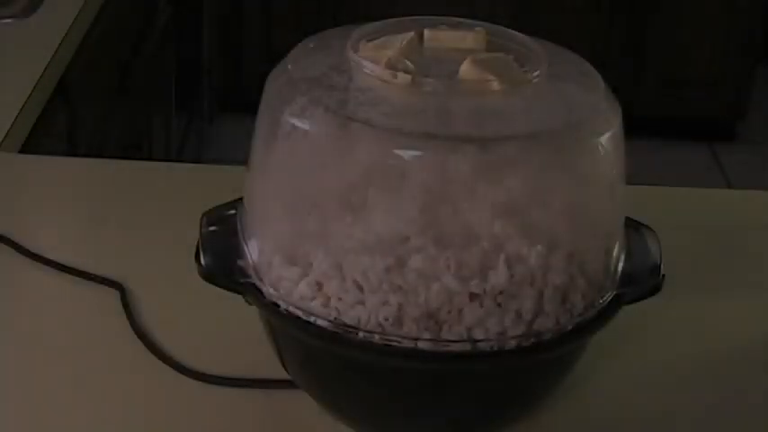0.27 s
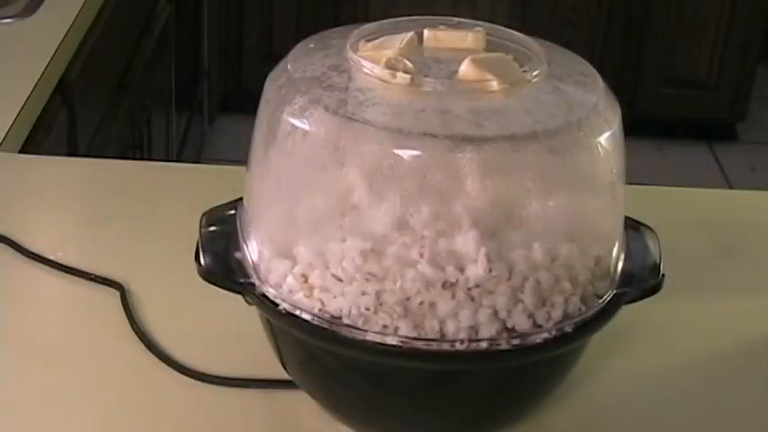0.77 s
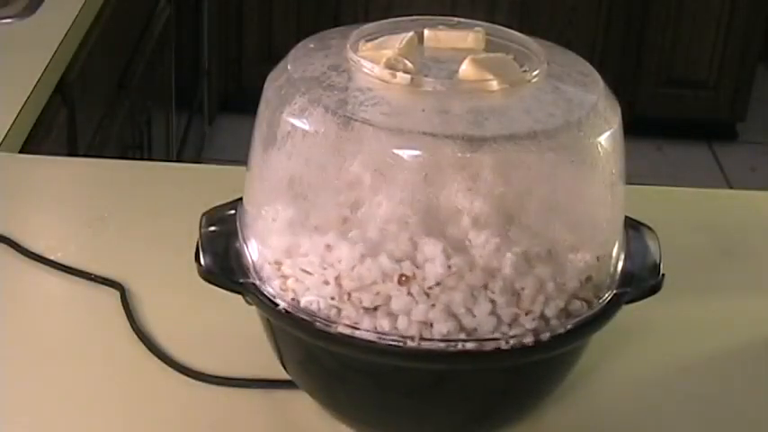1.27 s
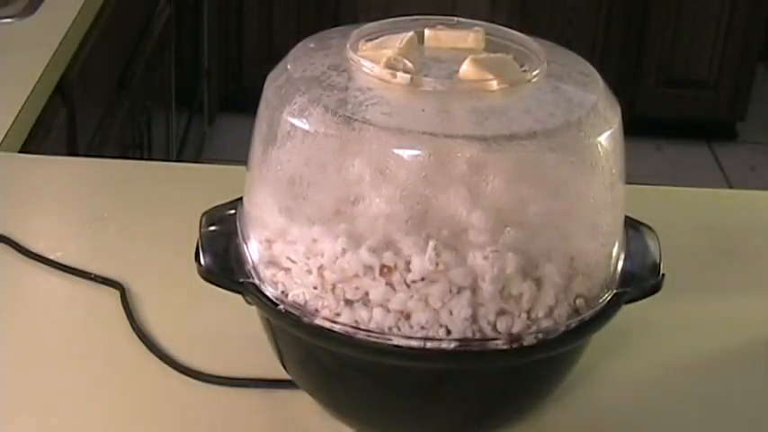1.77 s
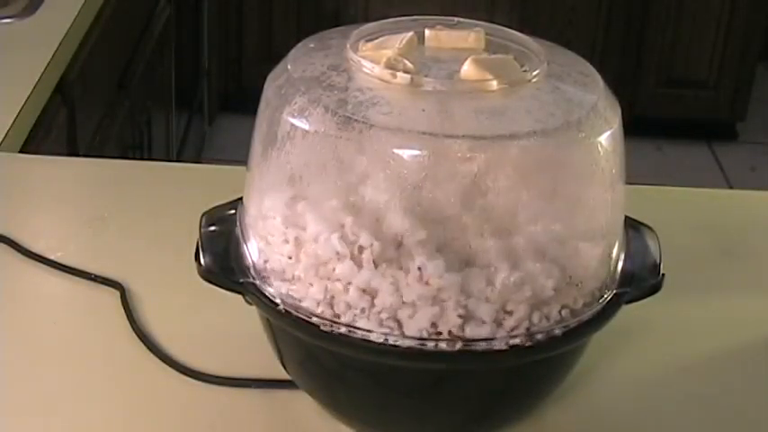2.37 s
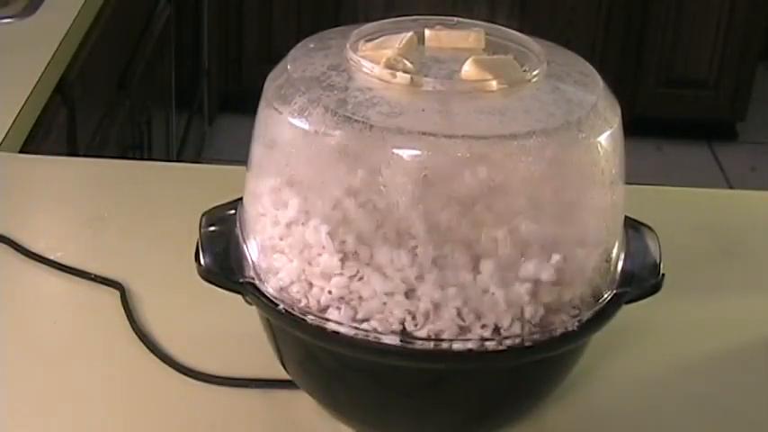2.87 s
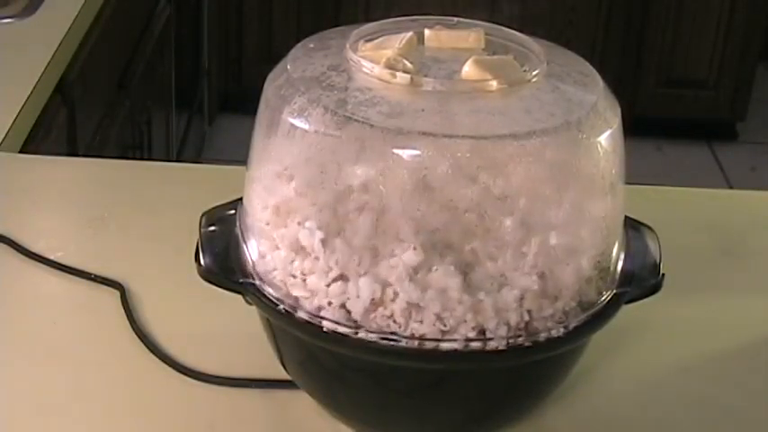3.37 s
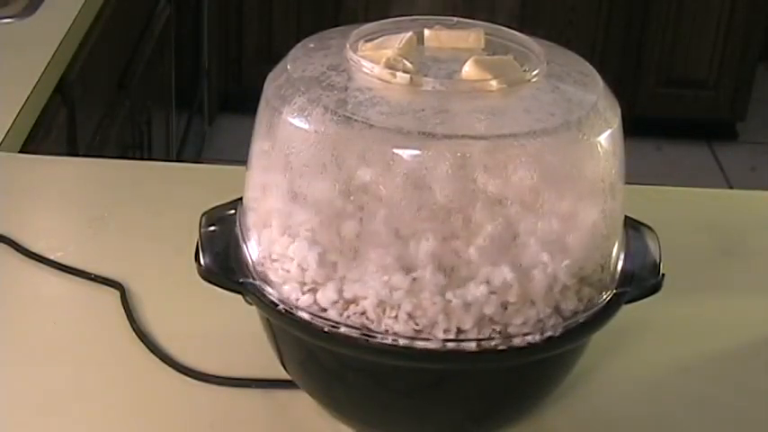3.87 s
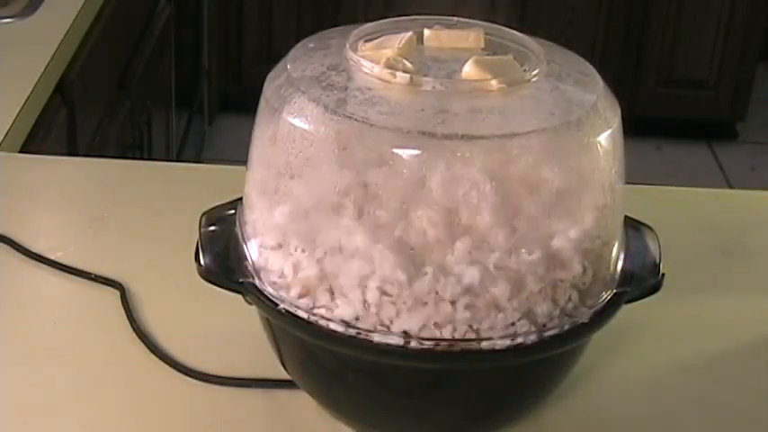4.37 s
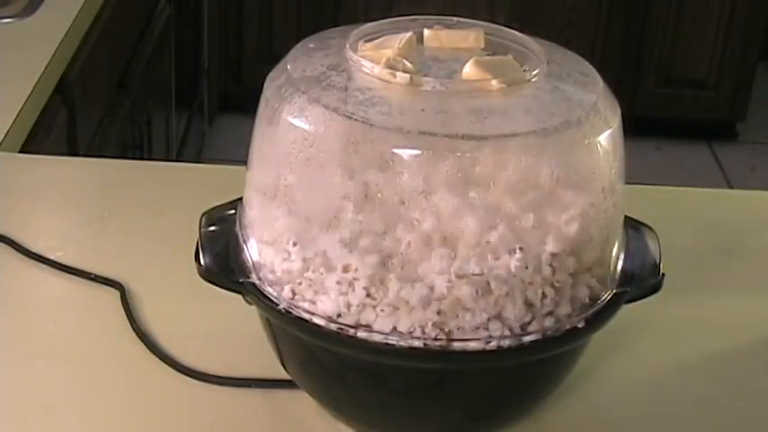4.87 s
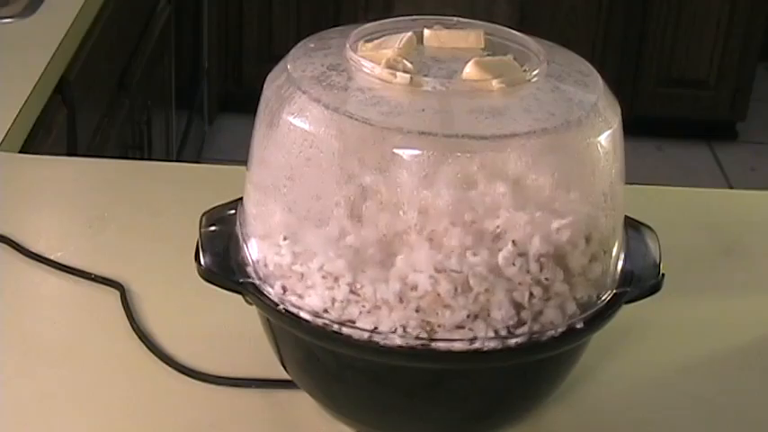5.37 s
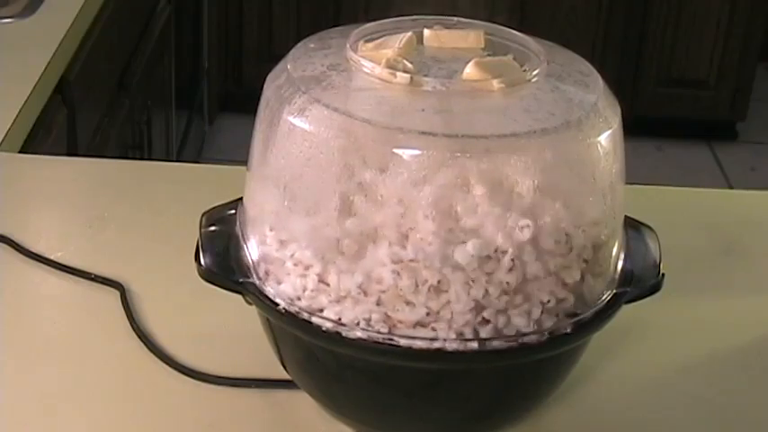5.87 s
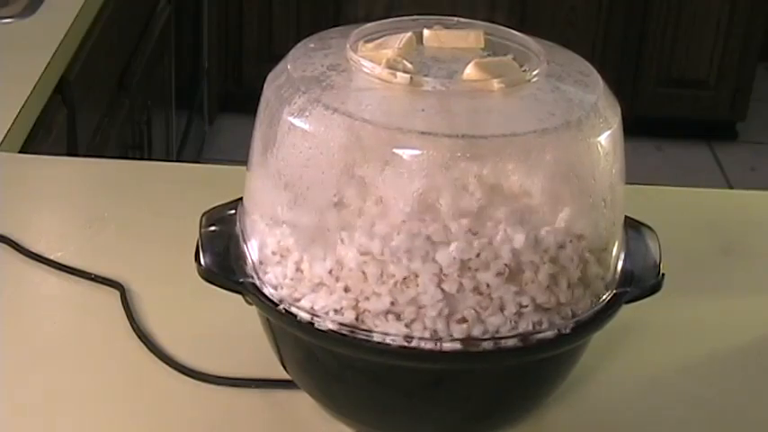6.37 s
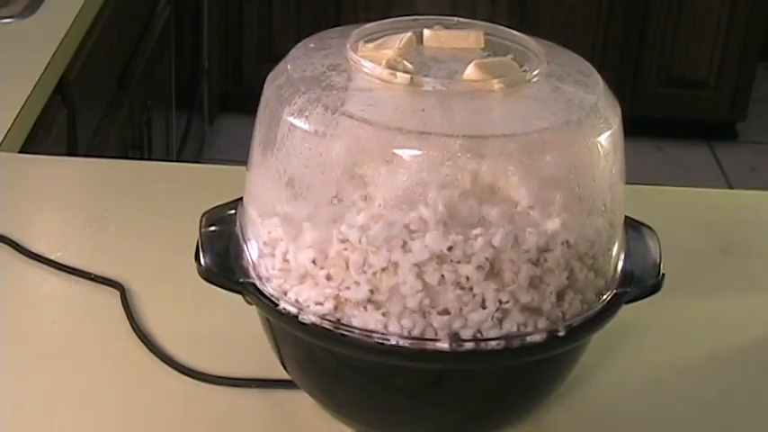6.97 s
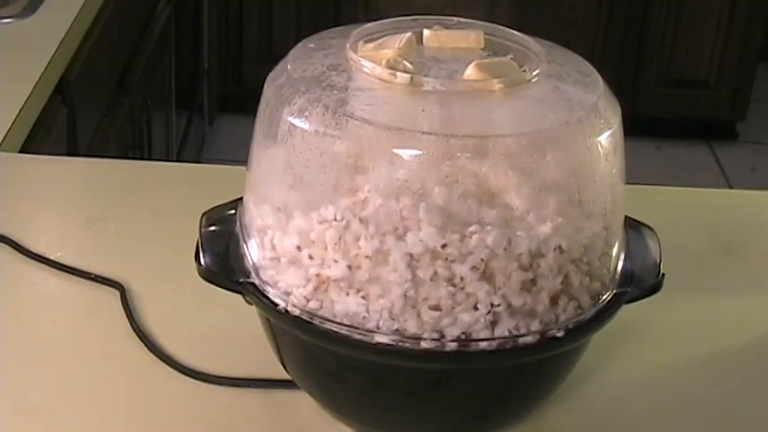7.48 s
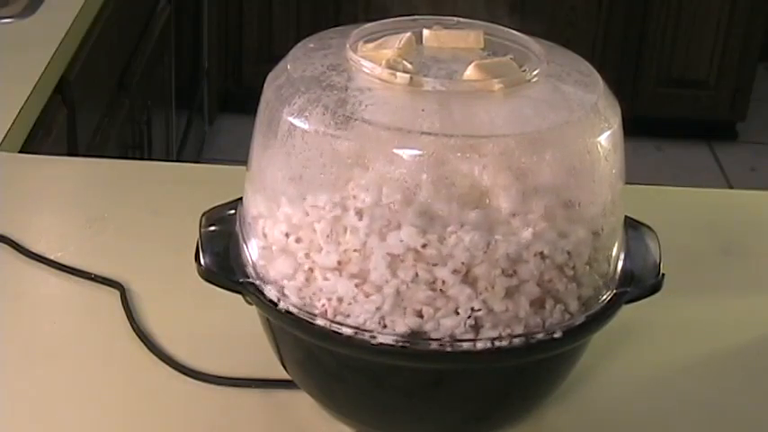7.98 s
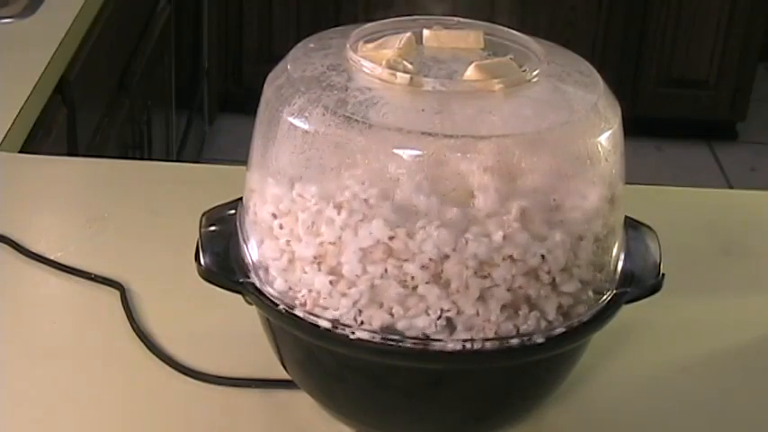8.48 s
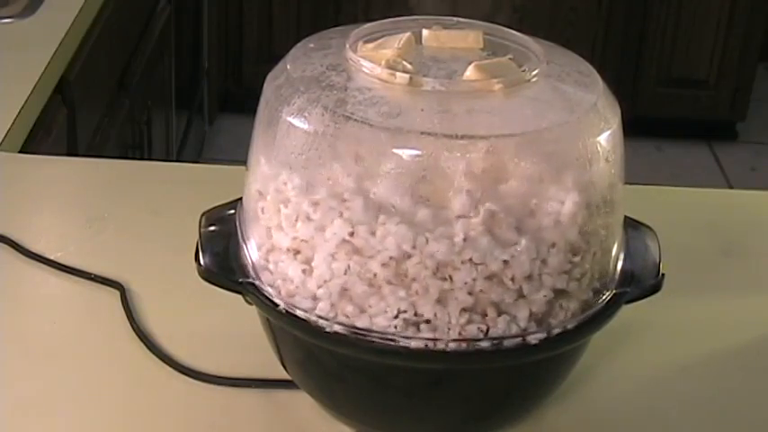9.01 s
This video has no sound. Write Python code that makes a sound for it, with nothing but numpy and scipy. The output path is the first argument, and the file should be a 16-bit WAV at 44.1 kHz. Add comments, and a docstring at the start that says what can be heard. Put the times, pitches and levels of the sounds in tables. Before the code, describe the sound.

Corn kernels pop fast and unevenly inside a covered popper, heard close in stereo with a short kitchen reverberation. Quiet ticks open, then loud cracks and dull thuds come roughly twenty or more a second, sometimes clustered, sometimes with tiny gaps. Light flakes rattle softly between them, and occasional harder hits slap the plastic dome. The motor is only a faint steady noise, and the loudest peaks sound slightly clipped.

```python
"""In a kitchen, an electric popcorn popper on the counter, close to a microphone. A motor and the room make
a faint steady rush of noise. Bursting kernels thump the bowl and its air (fading sine tones), crack (short
noise bursts) and knock the plastic dome (noise through resonances). Flakes land softly just after, a few
throws of corn slam the dome wall, and the kitchen answers with reflections."""
import sys
import numpy as np
from scipy import signal
from scipy.fft import rfft, irfft, next_fast_len
from scipy.io import wavfile

SR = 44100
rng = np.random.default_rng(int(sys.argv[2]) if len(sys.argv) > 2 else 0)


def master_out(mix):
    """Clip the mix to full scale and print it as 16-bit PCM to the path in sys.argv[1]."""
    frames = np.transpose(np.atleast_2d(mix))
    ceiling = np.clip(frames, -1, 1)
    pcm = np.round(ceiling * 32767).astype(np.int16)
    wavfile.write(sys.argv[1], SR, pcm)


N = 407699


def amp(db):
    """Turn decibels into a gain."""
    return 10 ** (np.asarray(db) / 20)


def along(points, hz):
    """Read a value between (f/Hz, value) points, on a log frequency axis."""
    f, value = np.transpose(points)
    return np.interp(np.log(hz + 1), np.log(f + 1), value)


def filtered(x, response):
    """Multiply the spectrum of x by a response that depends on frequency."""
    m = next_fast_len(N + SR)
    return irfft(rfft(x, m) * response(np.fft.rfftfreq(m, 1 / SR)), m)[..., :N]


def resonance(f, hz, width_hz):
    """One resonance that rings only after it is struck, gain 1 at its peak."""
    return 1j * f * width_hz / (hz * hz - f * f + 1j * f * width_hz)


def place(seconds, sounds):
    """Add one row of sound at each time."""
    starts = np.round(seconds * SR).astype(int)[:, None]
    at = starts + np.arange(sounds.shape[1])
    return np.bincount(at.ravel(), sounds.ravel(), N + SR)[:N]


def puffs(seconds, db, t60, rise_s, grain_db):
    """A grainy, dying noise burst of uneven length at each time; one track for each column of levels."""
    t = np.arange(SR // 20) / SR
    uneven_t60 = t60 * rng.lognormal(0, 0.25, (len(seconds), 1))
    shape = amp(-60 * t / uneven_t60) * (1 - np.exp(-t / rise_s))
    # the loudness jumps at random every 32 samples
    grains = amp(grain_db * rng.standard_normal((len(seconds), len(t) // 32 + 1)))
    grains = grains.repeat(32, axis=1)[:, :len(t)]
    noise = shape * grains * rng.standard_normal((len(seconds), len(t)))
    return np.array([place(seconds, amp(level)[:, None] * noise) for level in db.T])


# how alike left and right are in spread-out sound: f/Hz, likeness [0-1]
LIKENESS = [(30, 0.85), (150, 1), (550, 0.81), (1200, 1), (9000, 0.66)]


def pair(x):
    """Mix two unrelated signals into left and right; the shared part sets how alike they are."""
    turn = lambda hz: np.arccos(np.clip(along(LIKENESS, hz), 0, 1)) / 2
    mid, side = filtered(x, lambda hz: np.array([np.cos(turn(hz)), np.sin(turn(hz))]))
    return np.array([mid + side, mid - side])


# tone colour of the motor and room noise: f/Hz, relative level/dB (per Hz)
MOTOR_COLOUR = [(30, -4.5), (110, -24.5), (230, -26), (8000, -42), (14000, -73)]


def motor():
    """Motor and room make a faint steady rush: coloured noise under the pops."""
    rush = filtered(rng.standard_normal((2, N)), lambda hz: amp(along(MOTOR_COLOUR, hz)))
    return amp(-31) * pair(rush / np.std(rush))


SPOT_DB = 2.2  # each knock rings each dome mode by its own amount (typical spread)
HEAPS = 8  # ways the corn can lie in the bowl
DETUNE = .025  # typical share by which the heap shifts the bowl's pitch
# ringing of the bowl and its air, close tones that beat: f/Hz, relative level/dB, time to fall 60 dB [s]
BOWL_MODES = [(166.7, -22, 0.36), (205.3, -18, 0.15), (278, -3.5, 0.078), (309.7, 1.5, 0.092),
              (346.1, -2, 0.081), (430.6, -6.5, 0.047), (489, -15, 0.094), (590, -14, 0.04)]


def thumps(seconds, thump_db):
    """Each burst pushes the bowl, which rings in dying tones tuned by how the heap lies."""
    t = np.arange(SR // 5) / SR
    hz, db, t60 = np.transpose(BOWL_MODES)[:, :, None]
    hz = hz * (1 + DETUNE * rng.standard_normal((HEAPS, 1, 1)))
    modes = amp(db - 60 * t / t60) * np.sin(2 * np.pi * hz * t) * (1 - np.exp(-t / 0.0017))
    # each push rings each tone by its own amount, 2.07 dB typical spread
    push = amp(thump_db[:, None] + 2.07 * rng.standard_normal((len(seconds), len(BOWL_MODES))))
    heap = rng.integers(HEAPS, size=len(seconds))
    return -sum(place(seconds[heap == k], push[heap == k] @ modes[k]) for k in range(HEAPS))


HULL_HZ, HULL_SPREAD_DB = 5200, 2.2  # border between dull and bright, and how far hulls vary


def dull_part(f):
    """Gain that keeps what lies below the dull-bright border."""
    return 1 / (1 + (f / HULL_HZ) ** 6)


SNAP_T60 = 0.0077  # s, typical time for a snap to fall 60 dB
ACROSS = .5  # how strongly cracks spread left and right across the heap
# crack of a hull, with the presence peak of the microphone: f/Hz, relative level/dB
CRACK_COLOUR = [(500, -3.5), (3000, 3), (5500, 4.5), (7750, 12), (10100, 2), (11300, -7.5), (14500, -35)]


def snaps(seconds, crack_db, knocks):
    """A hull snaps in a very short noise burst, duller or brighter, left or right; mid and side."""
    dull_db = HULL_SPREAD_DB * rng.standard_normal(len(seconds))
    left = rng.random(len(seconds)) < .5
    side_db = crack_db[:, None] + np.where(np.c_[left, ~left], 0, -99)  # -99 dB: silent
    levels = np.c_[crack_db + dull_db, crack_db - dull_db / 2, side_db]
    dull, bright, on_left, on_right = puffs(seconds, levels, SNAP_T60, rise_s=.0001, grain_db=1.5)
    bright = bright + amp(-23.0) * knocks.mean(0)  # the knocks add a little treble
    snap = filtered(dull, dull_part) + filtered(bright, lambda f: 1 - dull_part(f))
    both = np.array([snap, ACROSS * (on_left - on_right)])
    return filtered(both, lambda f: amp(along(CRACK_COLOUR, f)))


RATTLE_HZ, RATTLE_WIDTH_HZ, RATTLE_DB = 2400, 4500, -13  # broad rattle of corn on plastic
# ringing of the plastic dome: f/Hz, width [Hz], relative level/dB
DOME_MODES = [(510, 80, -5), (872, 130, -5.5), (1090, 68, 0), (1247.5, 70, 1.5), (1681, 99, -1),
              (2226, 90, -3), (2666, 197, -6)]


def dome_knocks(knocks):
    """Corn knocks the plastic: noise bursts ring the dome's resonances, with a broad rattle."""
    hz, width_hz, db = np.transpose(DOME_MODES)[:, :, None]
    dome = filtered(knocks, lambda f: amp(db) * resonance(f, hz, width_hz))
    rattle_shape = lambda f: resonance(f, RATTLE_HZ, RATTLE_WIDTH_HZ) * dull_part(f)
    rattle = amp(RATTLE_DB) * filtered(knocks.mean(0), rattle_shape)
    # neighbouring modes move in opposite directions
    return dome[::2].sum(0) - dome[1::2].sum(0) + rattle


THROW_S = .003  # s, longest flight of the burst corn to the dome


def bursts(seconds, thump_db, knock_db, crack_db):
    """Each burst thumps the bowl, snaps, and a moment later knocks the dome; mid and side."""
    struck = seconds + THROW_S * rng.random(len(seconds)) ** 3
    spot_db = SPOT_DB * rng.standard_normal((len(seconds), len(DOME_MODES)))
    knocks = puffs(struck, knock_db[:, None] + spot_db, 0.043, rise_s=.0004, grain_db=3)
    mid, side = snaps(seconds, crack_db, knocks)
    return np.array([dome_knocks(knocks) + mid + thumps(seconds, thump_db), side])


ORDINARY_DB = (-12, -11)  # thump and crack of an ordinary pop
KNOCK_OVER_THUMP_DB, KNOCK_OVER_CRACK_DB = 8.5, 0.5  # both thump and crack knock the dome
FLAKES, FLIGHT_S = 9, .09  # flakes thrown by each pop; spread of their flight times [s]
FLAKE_DB, FLAKE_SPREAD_DB = -18, 12  # largest flake against its pop, range of sizes
# kernels bursting: t/s, thump level/dB, crack level/dB; a time alone is an ordinary pop
KERNELS = [(0.001, -24, -26), (0.042, -22.5, -18), (0.123, -25.5, -15.5), (0.148, -22.5, -13),
           (0.164, -21, -21), (0.244, -13, -22), (0.327, -10.5, -21), (0.417, -13.5, -36), (0.447, -7, -18),
           (0.496), (0.511), (0.522), (0.573, -15, -6), (0.618), (0.709), (0.738, -7.5, -18),
           (0.763, -28, -3), (0.795, -4.5, -4), (0.823), (0.833, -22, -5.5), (0.95), (0.988),
           (1.018, -13.5, -3.5), (1.075, -26, -7.5), (1.088), (1.103), (1.127), (1.144), (1.288, -8, -13),
           (1.343, -9.5, -19), (1.421, -8.5, -9), (1.433, -7.5, -4.5), (1.461), (1.529, -28, -6), (1.549),
           (1.565), (1.587), (1.603), (1.644), (1.692, -8, -10), (1.715), (1.776, -8, -15), (1.82), (1.918),
           (1.936), (1.981, -7.5, -23), (2.019), (2.043, -7, -12), (2.112, -11, -3), (2.166, -8, -9),
           (2.18), (2.217, -4.0, -11), (2.285), (2.3, -10.5, -27), (2.39), (2.401), (2.409, -9, -25),
           (2.422, -8.5, -3), (2.501), (2.533), (2.55, -31, -6), (2.592, -12.5, -4.5), (2.643), (2.66),
           (2.724, -16, -5.0), (2.75), (2.828, -9, -19), (2.847), (2.9, -9.5, -18), (2.911),
           (2.951, -10, -21), (2.997), (3.005, -15, -5.5), (3.042, -28, -5.5), (3.1, -14.5, -6),
           (3.157, -32, -7), (3.236, -4.5, -11.0), (3.305), (3.385, -21, -2.5), (3.403), (3.43, -14, -4),
           (3.525, -8, -13), (3.557), (3.603), (3.674, -7.5, -10), (3.828), (3.841, -7, -5.5),
           (3.887, -15, -3), (3.924), (3.967, -11.5, -7), (3.998, -5.5, -15), (4.021, -9, -20),
           (4.076, -29, -1), (4.098), (4.125), (4.174), (4.187), (4.224), (4.245, -20, -12), (4.253),
           (4.27, -11.5, -22), (4.29), (4.343), (4.381), (4.472), (4.486, -20.5, -4), (4.505), (4.533),
           (4.572), (4.594, -9.5, -2.5), (4.63), (4.65, -8.0, -20), (4.669, -8, -10), (4.702),
           (4.822, -9, -14), (4.836, -7, -12), (4.879, -6.0, -26), (4.92, -7.5, -15.0), (4.946), (4.972),
           (5.001, -21, -6.5), (5.063, -8, -31), (5.083), (5.129, -18, -5), (5.194, -10, -20.5),
           (5.272, -9, -22), (5.336, -8, -5.5), (5.399, -10.5, -5), (5.407), (5.42), (5.484, -29.5, -6),
           (5.543, -15, -26), (5.617, -17, -6), (5.687), (5.736, -12.5, -3.5), (5.78), (5.802, -20, -7.5),
           (5.816), (5.896), (5.946), (6.016, -18, -6), (6.035), (6.051, -9, -21), (6.093),
           (6.119, -25, -5), (6.167, -7, -12), (6.183), (6.214, -29, -11.5), (6.286, -15, -7.0), (6.307),
           (6.361), (6.407), (6.493, -7.5, -10), (6.54), (6.568), (6.591), (6.62), (6.651, -19, -1),
           (6.718, -5, -24), (6.734), (6.791), (6.898, -3.5, -23), (6.944), (6.987), (7.001, -26, -6),
           (7.025), (7.054), (7.081, -8, -16), (7.099), (7.136), (7.162), (7.22), (7.28), (7.307, -6, -5.5),
           (7.32), (7.334, -11.5, -23), (7.354, -13, -6), (7.395), (7.412), (7.442), (7.457), (7.477),
           (7.492, -11, -27), (7.573, -27, -3.5), (7.581, -24.0, -10.5), (7.59, -6.5, -24), (7.611), (7.62),
           (7.7, -6.5, -26), (7.734, -34, -8.5), (7.795, -12.5, -4), (7.855), (7.886), (7.911),
           (7.945, -9, -1), (8.009, -12, -20), (8.025, -32.5, -5), (8.095, -8, -21), (8.149, -19, -7),
           (8.167), (8.186), (8.247, -6, -15), (8.254, -22, -8.5), (8.309), (8.375, -9, -17),
           (8.46, -14.5, -2), (8.479), (8.521, -4.5, -15.5), (8.53, -21, -5.0), (8.542), (8.643, -21, -0.5),
           (8.679), (8.688, -8, -14.0), (8.713, -11, -3.5), (8.725), (8.772, -8, -26), (8.79), (8.8),
           (8.831), (8.874, -14.5, -5), (9.007), (9.026, -39, -6), (9.095, -8, -12.5), (9.158, -14.5, -30),
           (9.175, -13, -3.5), (9.22, -20, -8)]
# corn thrown hard against the dome wall: t/s, knock level/dB
WALL_SLAMS = [(0.768, -1), (3.249, -1), (3.998, 4), (5.068, 3), (6.728, -1), (6.897, 3), (7.794, 2)]


def popping():
    """Each pop thumps, cracks and knocks the dome; its flakes land soon after; thrown corn slams the wall."""
    s, thump_db, crack_db = np.transpose([np.r_[row, ORDINARY_DB][:3] for row in KERNELS])
    # the energies of the two causes add up
    knock_energy = amp(thump_db + KNOCK_OVER_THUMP_DB) ** 2 + amp(crack_db + KNOCK_OVER_CRACK_DB) ** 2
    pops = bursts(s, thump_db, 10 * np.log10(knock_energy), crack_db)
    chance = rng.random((len(s), FLAKES, 3))  # flight, size, crispness
    pop_db = np.maximum(thump_db, crack_db - 3.5)[:, None]
    size_db = (pop_db + FLAKE_DB - FLAKE_SPREAD_DB * chance[..., 1]).ravel()
    landing = np.minimum(s[:, None] + .005 + FLIGHT_S * chance[..., 0] ** 2, N / SR).ravel()
    flakes = bursts(landing, size_db, size_db + 10.5, size_db + 5 * chance[..., 2].ravel())
    hit, slam_db = np.transpose(WALL_SLAMS)
    slams = bursts(hit, slam_db - 60, slam_db, slam_db - 60)  # practically a knock alone
    return pops + flakes + slams


# how long the kitchen rings: f/Hz, time to fall 60 dB [s]
KITCHEN_RING = [(300, 0.56), (2000, 0.45), (10000, 0.25)]


def kitchen(x):
    """Reflections die away faster in the treble; a new noise tail each 0.1 s, as pops come from new spots."""
    out, size = np.zeros((2, N + SR)), SR // 10
    first = round(.004 * SR)  # the reflections arrive 4 ms late
    for start in range(0, N, size):
        hz, t, z = signal.stft(rng.standard_normal((2, SR // 3)), SR, nperseg=128)
        fade = amp(-60 * t / along(KITCHEN_RING, hz)[:, None])
        tail = signal.istft(z * fade, SR, nperseg=128)[1]
        wet = signal.fftconvolve(x[None, start:start + size], tail / np.linalg.norm(tail[0]), axes=1)
        out[:, start + first:][:, :wet.shape[1]] += wet
    return pair(out[:, :N])


def scene():
    """The popper is nearly straight ahead; sound reaches the right port a little later, its treble weaker."""
    pops, side = popping()
    sign = [1, -1]  # left, right
    level = lambda hz: amp(np.outer(sign, 0.8 * np.abs(resonance(hz, 6000, 5000))))
    ports = lambda hz: level(hz) * np.exp(1j * np.outer(sign, hz / 30000))
    # cupboards swallow the bass of the reflections
    walls = filtered(kitchen(pops), lambda hz: 1j * hz / (500 + 1j * hz))
    side = filtered(side, lambda hz: hz / (hz + 6000))  # left and right differ mostly in the treble
    direct = filtered(np.array([pops + side, pops - side]), ports)
    return direct + amp(-6.0) * walls + motor()


TOP_HZ = 16000  # nothing above this passes


def record(dry):
    """The microphone drops the deep bass, the loudest peaks clip, the converter has an offset and a band limit."""
    thin = filtered(dry, lambda hz: (1j * hz / (80 + 1j * hz)) ** 3)
    clipped = np.clip(thin + 0.0063, -1, 1)
    return filtered(clipped, lambda hz: hz < TOP_HZ)


dry = scene()
out = record(dry)
master_out(out)
```